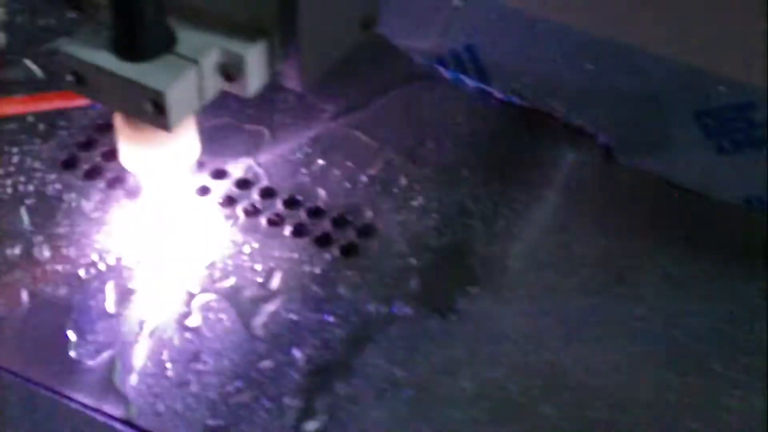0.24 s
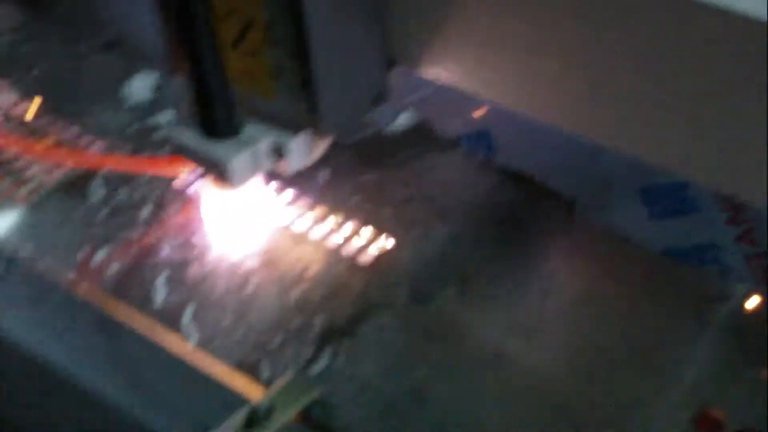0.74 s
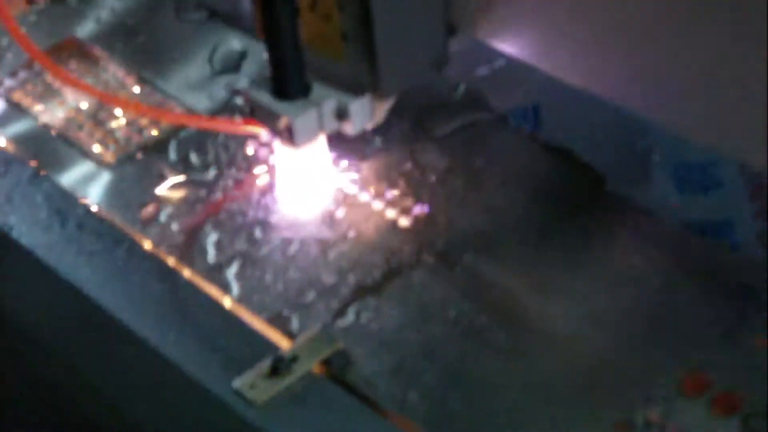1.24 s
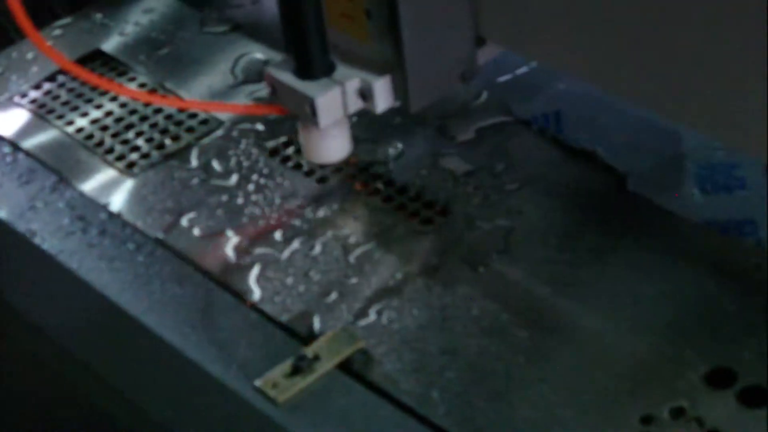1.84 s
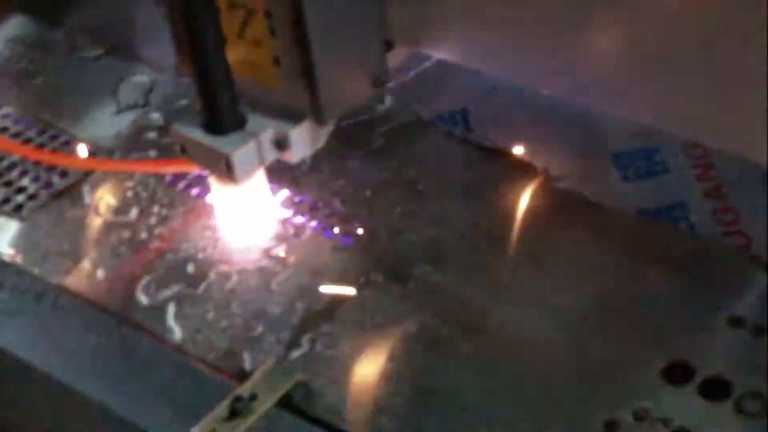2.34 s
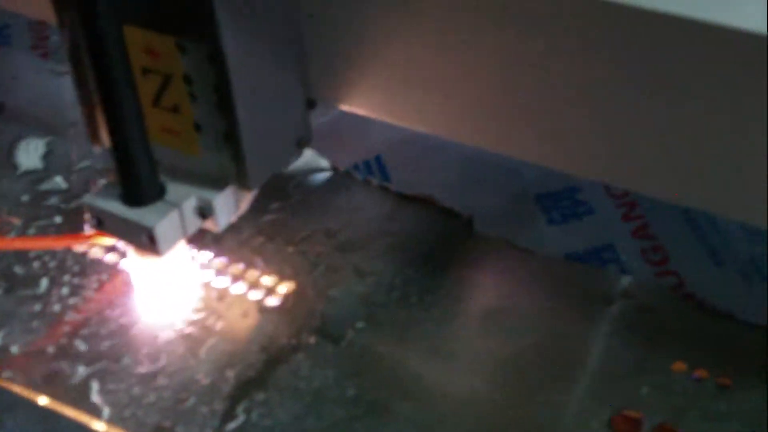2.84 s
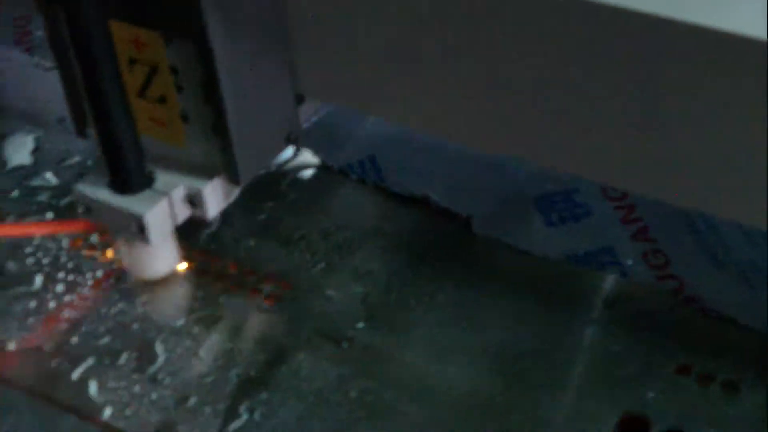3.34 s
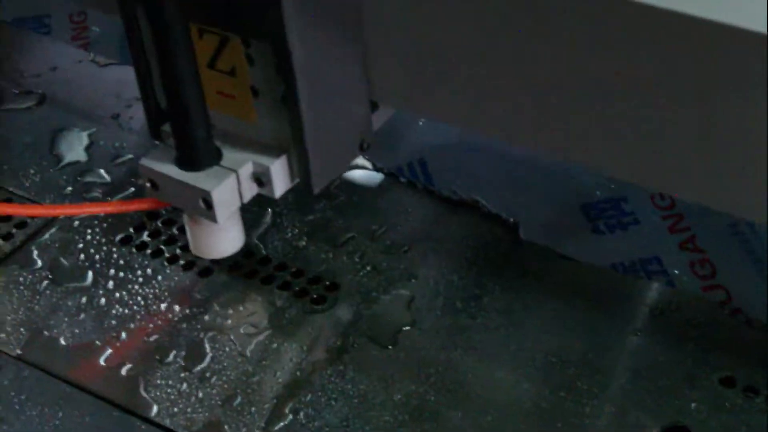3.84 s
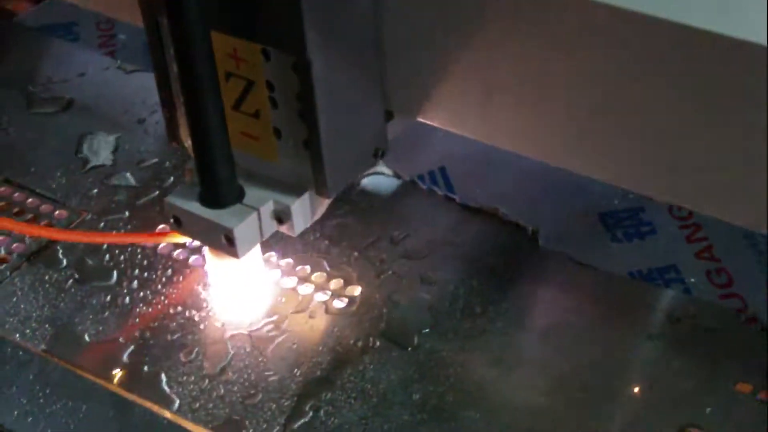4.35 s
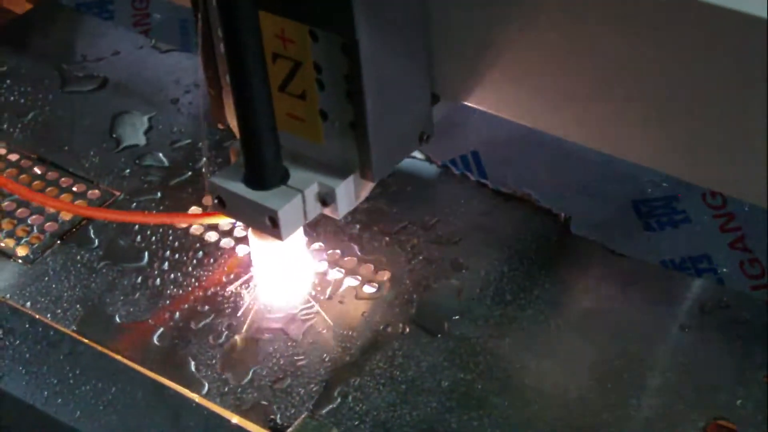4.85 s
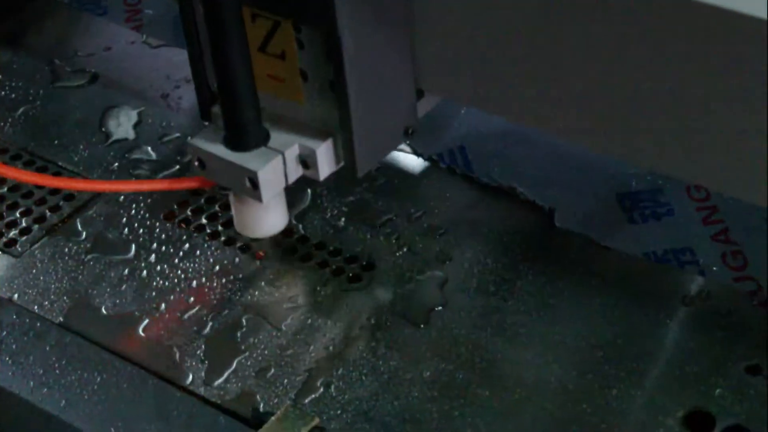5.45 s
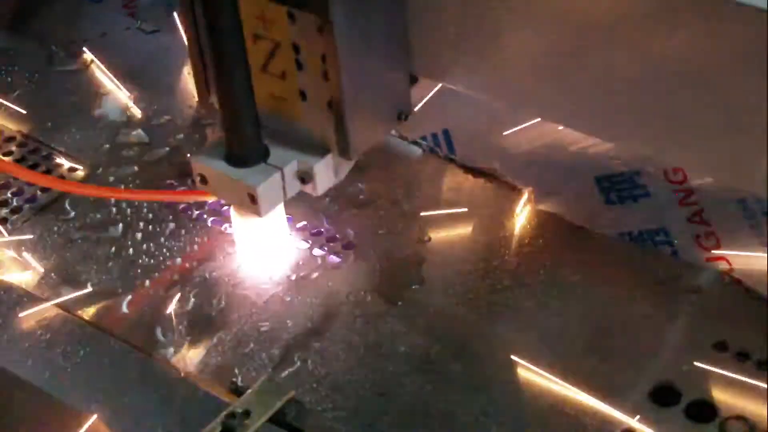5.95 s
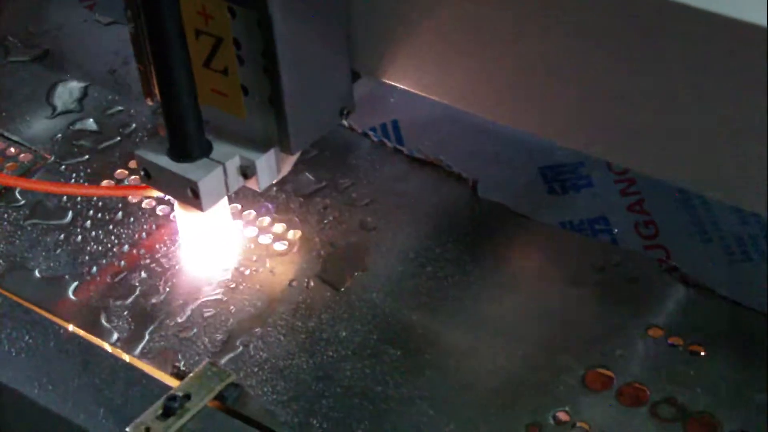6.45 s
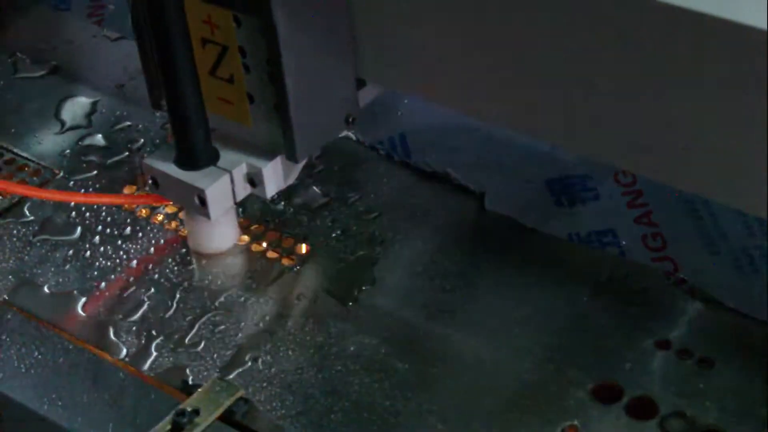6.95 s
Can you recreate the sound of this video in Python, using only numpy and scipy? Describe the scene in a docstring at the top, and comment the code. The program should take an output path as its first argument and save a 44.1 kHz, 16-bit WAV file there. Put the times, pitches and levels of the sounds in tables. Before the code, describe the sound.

A plasma torch cuts four small holes in a steel sheet, heard close by in a factory. Before each hole compressed air rushes and howls. The arc strikes with a sharp crack, blasts briefly through the metal, then hisses brightly for about a second with small ticks of spatter before it falters and goes out. Brief whistles come and go, while a thin drive whine and a low extractor drone sit underneath.

```python
"""A factory cutting table, where a plasma torch cuts four small holes in a steel sheet.
For each hole a turbulent air jet rushes, and the gap under the nozzle howls by resonance. The arc
strikes with a crack, pierces the sheet, hisses round the cut amid bursting droplets, falters and
goes out. Edge tones hoot now and then; the extractor drones and the drives whine throughout."""
import sys
import numpy as np
from scipy import signal
from scipy.fft import rfft, irfft, next_fast_len
from scipy.io import wavfile

SR = 44100
rng = np.random.default_rng(int(sys.argv[2]) if len(sys.argv) > 2 else 0)


def log_audio(samples):
    """Write samples as a 16-bit WAV file to the path given in sys.argv[1]."""
    # one column per channel
    frames = np.atleast_2d(samples).T
    # limit to full scale, then quantise
    limited = np.clip(frames, -1, 1)
    pcm = np.round(limited * 32767).astype(np.int16)
    wavfile.write(sys.argv[1], SR, pcm)


N = 317079
TIME = np.arange(N) / SR

# Levels in the tables are relative, within each source.
# The holes. Each row: strike, piercing time and settling time in seconds; levels of piercing, hiss,
# kerf roar, whine and falter in dB; pitch of the kerf whistle in Hz, its level in dB.
CUTS = [(0.287, 0.2, 0.23, -17, -16.5, -26, -30.5, -2, 5550, -34),
        (2.122, .201, 0.15, -16, -16.5, -26, -26.5, -5, 2580, -37),
        (3.9595, .197, 0.33, -17.5, -16.5, -27, -30.5, -3, 2610, -38),
        (5.799, 0.2, 0.17, -16.5, -16.5, -26.5, -31.5, -21.5, 4560, -38)]
# Torch moves, before each hole and after the last. Each row: levels in dB of rush (torch high),
# hiss (torch low), howl, low roar and whine.
TORCH_MOVES = [(-27, -18.5, -20, -29, -32), (-20.5, -19.5, -21.5, -27, -23.5), (-18, -20, -22, -26, -26.5),
               (-18.5, -19, -21.5, -27.5, -25.5), (-18.5, -19.3, -20.5, -29, -27)]
# The arc strikes, spits or falters. Each row: start in seconds, level in dB, pitch in Hz.
ARC_CRACKS = [(0.295, -9, 2800), (1.096, -12, 6600), (1.454, -18, 2030), (2.1247, -3, 2810),
              (2.131, -12, 7600), (3.28, -17, 2010), (3.9626, -2, 2640), (4.026, -13, 7160),
              (5.114, -12.5, 2240), (5.8005, -2, 2620), (6.945, -16, 1930)]
# Stray hoots, probably the jet crossing the edges of finished holes.
# Each row: middle in seconds, pitch in Hz, level in dB, length in seconds.
STRAY_HOOTS = [(.11, 603, -33, .26), (1.33, 1300, -28.5, 0.11), (1.41, 1084, -32, 0.32),
               (1.422, 3180, -33, 0.24), (1.70, 698, -29.5, 0.095), (1.828, 1104, -20, .023),
               (3.1, 7100, -26, .43), (3.315, 1500, -27, .056), (3.345, 770, -29.5, 0.058),
               (3.578, 2455, -21.5, 0.214), (3.78, 1114, -29.5, .24), (3.91, 2520, -22, 0.14),
               (3.95, 670, -26, 0.042), (5.775, 3010, -22, 0.072), (6.9, 1606, -27, .06)]
# Hum of the table and the hall's fans. Each row: pitch in Hz, level in dB, width in Hz.
HUM_TONES = [(250.3, -51.5, 8.3), (466, -49, 22), (686, -48.5, 3.5), (878, -49.5, 9.2), (1240, -48.5, 14.2)]
# Noise spectra. Each row: frequency in Hz, spectral density in dB.
RUSH_SPECTRUM = [(1500, -25), (3000, -22), (3800, -1.5), (4800, 0), (6000, 1), (7300, 3.5), (8500, 1.5),
                 (10500, -0.5), (12000, -4), (15000, -9.5)]  # air, torch high
HISS_SPECTRUM = [(1500, -14.5), (3600, -9), (4500, -2), (5500, -2), (6500, -0.5), (7500, 5), (8400, 7),
                 (10500, 5.5), (11400, 2.5), (12500, 1), (13600, -4), (15200, -3.5)]  # air, torch low
ROAR_SPECTRUM = [(80, -22.5), (200, -8), (300, -1), (480, -2), (700, 1), (880, -1.5), (1150, 0.5),
                 (1350, 4.5), (1600, 0), (2100, 0), (3000, -0.5), (5000, -34)]  # low roar of the air
WIDE_GAP = [(1500, -19), (2400, -2.5), (3300, -3.5), (4200, -4.5), (5200, -28)]  # howl, torch high
NARROW_GAP = [(1500, -58), (2100, -15), (2380, -1.5), (2800, -2), (3150, -2.5), (3450, -8), (3850, -13.5),
              (5000, -24)]  # howl, torch low
EXTRACTOR_SPECTRUM = [(22, -29), (45, -34), (57, -23), (66, -24.5), (92, -26), (114, -7), (132, -13),
                      (155, -2.5), (182, -7.5), (250, 2), (360, -1), (700, -5), (1300, 0), (3000, -3),
                      (12000, -47)]
BLAST_SPECTRUM = [(200, -19), (600, -7), (1150, -4), (1900, -0.5), (3000, 0), (4000, -1), (5500, 2.5),
                  (7300, 3), (8400, 8), (10500, 3.5), (12300, 2), (13300, -2), (15200, -4)]  # arc on the closed sheet
SHALLOW_PIT = [(9000, -20), (12200, -2), (13500, -5), (15200, -1)]
DEEP_PIT = [(2500, -38), (4600, -1), (6200, -0.5), (7300, 11.5), (8600, -12), (12000, -24)]
CUT_SPECTRUM = [(1500, -20), (3200, -8), (4500, 0.5), (6000, 0.5), (7100, 3.5), (8500, 3.5), (10500, 2),
                (12000, 1.5), (13500, -2), (15200, -3)]  # hiss of the cutting jet
KERF_SPECTRUM = [(150, -41), (430, -8), (700, -4.5), (950, -5.5), (1300, 3), (1600, 1.5), (2100, -2),
                 (2600, 4), (3300, 3), (4000, -2.5), (6000, -37.5)]  # roar in the slot being cut

# A move, timed from its start.
MOVE_S = .64  # length of the first and last moves
VALVE_S, VALVE_OPENS_S, IDLE_AIR_DB = .085, 0.065, -9.5  # the air idles, then reaches full flow
SINKS_S, SINKING_S = .28, 0.075  # the torch sinks to the sheet
HOWL_S, HOWL_BUILDS_S, HOWL_NARROWS_S, IDLE_HOWL_DB = .07, 0.13, 0.32, -18.5
ROAR_S, ROAR_BUILDS_S, IDLE_ROAR_DB = 0.053, 0.2, -9.5
BUFFET_S, BUFFET_WIDTH_S, BUFFET_DB = 0.353, 0.044, 4.5  # the sinking jet buffets the sheet
WHINE_GROWS_DB_PER_S, WHINE_PEAK_DB, WHINE_PEAK_S = 7, 3, 0.08  # the whine peaks at the strike
# A cut, timed from the breakthrough. At first the jet is slack, falling freely through the fresh pit.
SLACK_S, SLACK_HISS_DB, SLACK_ROAR_DB, SLACK_WHINE_DB = 0.06, -5, -6.5, -9.5
FACING_S, TURN_S, TURN_HISS_DB, TURN_ROAR_DB = 0.46, 0.61, .5, 1.28  # the torch circles
CLOSING_S, CLOSING_TAKES_S, CLOSING_HISS_DB, CLOSING_ROAR_DB = 0.74, 0.26, 0.55, 4  # the circle closes
BURN_S, FALTER_S, CATCH_S = 1.198, .042, .023  # the arc's life; falter and catch count back from its end


def amp(db):
    """Amplitude grows tenfold with every 20 dB."""
    return 10 ** (np.asarray(db) / 20)


def unit(x):
    """Normalisation to rms 1."""
    return x / np.sqrt(np.mean(x ** 2) + 1e-20)


def gate(start, stop, rise, fall):
    """Exponential growth from start and decay from stop, with time constants in seconds."""
    return (1 - np.exp(-np.maximum(TIME - start, 0) / rise)) * np.exp(-np.maximum(TIME - stop, 0) / fall)


def ramp(start, length):
    """Linear rise from 0 to 1."""
    return np.clip((TIME - start) / length, 0, 1)


def colour(spectrum, hz):
    """Spectral envelope in dB, rolling off by 18 dB an octave below its first point."""
    f, level = np.transpose(spectrum)
    return np.interp(np.log(hz + 1), np.log(f), level) + 18 * np.minimum(np.log2((hz + 1) / f[0]), 0)


def wander(rate_hz):
    """Low-pass noise: a smooth random fluctuation of rms 1."""
    hz = np.fft.rfftfreq(N, 1 / SR)
    smooth = irfft(rfft(rng.standard_normal(N)) * np.exp(-(hz / rate_hz) ** 2), N)
    return unit(np.interp(TIME, TIME[::16], smooth[::16]))


def patches(shape, span_s, span_hz):
    """A random field of rms 1, correlated over the given time and bandwidth, with no broad tilt."""
    frames, bins = shape
    in_time = np.exp(-(np.fft.fftfreq(frames, 512 / SR) * span_s * 2) ** 2)
    fineness = np.fft.rfftfreq(bins, SR / 2048) * span_hz * 2
    in_pitch = fineness * np.exp(-fineness ** 2)
    white = np.fft.rfft2(rng.standard_normal(shape))
    return unit(np.fft.irfft2(white * in_time[:, None] * in_pitch, shape))


def jet(spectrum, ripple_db, eddy_db, flutter_db, eddy_hz=300):
    """Turbulent noise: reflections off the steel comb its spectrum; eddies make it flicker and flutter."""
    hz = np.fft.rfftfreq(2048, 1 / SR)
    shape = (next_fast_len(N // 512 + 5), len(hz))
    comb = patches(shape, .6, 45) + .45 * patches(shape, .6, 170)
    field_db = colour(spectrum, hz) + ripple_db * comb + eddy_db * patches(shape, 0.018, eddy_hz)
    frames = (rng.standard_normal(shape) + 1j * rng.standard_normal(shape)) * amp(field_db)
    noise = signal.istft(frames.T, nperseg=2048, noverlap=1536)[1][:N]
    return unit(noise * amp(flutter_db * wander(91)))


def tone(hz, width_hz, steady):
    """Multipath interference in the hall makes a tone waver."""
    fading = steady + (wander(width_hz) + 1j * wander(width_hz)) / np.sqrt(2)
    return unit((fading * np.exp(2j * np.pi * hz * TIME)).real)


def arcs():
    """Times at which each arc strikes, breaks through and goes out."""
    return [(strike, strike + pierce, strike + BURN_S) for strike, pierce, *_ in CUTS]


def travels():
    """Start and end of each move, between one arc and the next."""
    strikes, _, outs = zip(*arcs())
    return list(zip([strikes[0] - MOVE_S, *outs], [*strikes, outs[-1] + MOVE_S]))


def air():
    """Jet noise and gap resonance: as the torch sinks, the hiss hollows out and the howl narrows."""
    rush, hiss, roar, howl, wide = np.zeros((5, N))
    for (start, strike), (rush_db, hiss_db, howl_db, roar_db, _) in zip(travels(), TORCH_MOVES):
        blowing = gate(start, strike, .003, 0.0039)
        high = np.exp(-np.maximum(TIME - start - SINKS_S, 0) / SINKING_S)
        wide = np.where(TIME >= start, 1 - ramp(start + HOWL_S, HOWL_NARROWS_S), wide)
        flow = blowing * amp(IDLE_AIR_DB * (1 - ramp(start + VALVE_S, VALVE_OPENS_S)))
        rush += flow * np.sqrt(high) * amp(rush_db)
        hiss += flow * np.sqrt(1 - high) * amp(hiss_db)
        buffet = np.exp(-((TIME - start - BUFFET_S) / BUFFET_WIDTH_S) ** 2)
        roar_idle = 1 - ramp(start + ROAR_S, ROAR_BUILDS_S)
        roar += blowing * amp(roar_db + IDLE_ROAR_DB * roar_idle + BUFFET_DB * buffet)
        # the howl lingers under the young arc and fades as the steel melts
        melting = amp(-2.0 - 42 * np.maximum(TIME - strike, 0))
        lingering = melting * gate(strike, strike + .195, .0048, .004)
        howl_idle = 1 - ramp(start + HOWL_S, HOWL_BUILDS_S)
        howl += (blowing + lingering) * amp(howl_db + IDLE_HOWL_DB * howl_idle)
    wide_gap = jet(WIDE_GAP, ripple_db=2.5, eddy_db=0.5, flutter_db=0.1)
    narrow_gap = amp(0.54) * jet(NARROW_GAP, ripple_db=1.9, eddy_db=3, flutter_db=0.55, eddy_hz=250)
    return (rush * jet(RUSH_SPECTRUM, ripple_db=1.0, eddy_db=2.5, flutter_db=0.5)
            + hiss * jet(HISS_SPECTRUM, ripple_db=3.0, eddy_db=-0.5, flutter_db=0.5)
            + roar * jet(ROAR_SPECTRUM, ripple_db=2.5, eddy_db=0.5, flutter_db=1.15)
            + howl * (np.sqrt(wide) * wide_gap + np.sqrt(1 - wide) * narrow_gap))


def machine():
    """Rotating machinery: broadband drone, fan tones and drive whine, all dipping during piercing."""
    envelope = amp(colour(EXTRACTOR_SPECTRUM, np.fft.rfftfreq(N, 1 / SR)))
    drone = amp(-33) * unit(irfft(rfft(rng.standard_normal(N)) * envelope, N))
    drone += sum(amp(db) * tone(hz, width, steady=.7) for hz, db, width in HUM_TONES)
    dip = sum(gate(strike, through, 0.02, 0.0173) for strike, through, _ in arcs())
    whine = np.zeros(N)
    for (start, strike), (*_, whine_db) in zip(travels(), TORCH_MOVES):
        ahead = np.maximum(strike - TIME, 0)
        swell_db = WHINE_PEAK_DB * np.exp(-ahead / WHINE_PEAK_S) - WHINE_GROWS_DB_PER_S * ahead
        whine += gate(start, strike, 0.046, .005) * amp(whine_db + swell_db)
    for (_, through, out), (_, _, settle, _, _, _, whine_db, *_) in zip(arcs(), CUTS):
        slack = 1 - ramp(through, settle)
        whine += gate(through, out, 0.0096, 0.021) * amp(whine_db + SLACK_WHINE_DB * slack)
    return drone * amp(-10.5 * dip) + whine * tone(6748, width_hz=36, steady=.6)


def hoot_events(sinking_hz=660, pit_hz=1130, pit_s=.08):
    """Edge tones on the way down, in the fresh pit and along the kerf, then the strays, in like rows."""
    rows = [(start + BUFFET_S, sinking_hz, -28.5, .075) for start, _ in travels()[1:-1]]
    for (strike, through, out), (*_, kerf_hz, level_db) in zip(arcs(), CUTS):
        rows.append((strike + pit_s / 2, pit_hz, -32.5, pit_s))
        rows.append((through + 0.63 * (out - through), kerf_hz, level_db, .7 * (out - through)))
    return rows + list(STRAY_HOOTS)


def hoots(width_hz=18, q=120):
    """Edge tones: a jet oscillates across an edge, giving a narrow noise band that swells and fades."""
    out = np.zeros(N)
    for middle, hz, level_db, length in hoot_events():
        t = np.arange(int(length * SR)) / SR
        blur = signal.butter(2, width_hz + hz / q, fs=SR, output="sos")
        drift = signal.sosfilt(blur, rng.standard_normal((2, 2 * SR)))[:, -len(t):]
        band = ((drift[0] + 1j * drift[1]) * np.exp(2j * np.pi * hz * t)).real
        hoot = unit(band * np.sin(np.pi * t / length))
        part = out[max(round((middle - length / 2) * SR), 0):][:len(t)]
        part += (amp(level_db - 5.0) * hoot)[:len(part)]
    return out


def piercing():
    """Cavity resonance: the arc blasts off the sheet, and the deepening pit rings lower until it opens."""
    blast, sizzle, shriek = np.zeros((3, N))
    for (strike, through, _), (_, _, _, level_db, *_) in zip(arcs(), CUTS):
        burning = amp(level_db) * gate(strike, through, 0.00078, 0.004)
        depth = np.clip((TIME - strike) / (through - strike), 0, 1)
        blast += burning * amp(1.26 - 2.82 * depth)
        sizzle += burning * amp(-7.0) * np.exp(-((depth - .55) / .25) ** 2)
        shriek += burning * amp(-1 - 24 * (1 - depth))
    return (blast * jet(BLAST_SPECTRUM, ripple_db=2.5, eddy_db=1.0, flutter_db=-1.2)
            + sizzle * jet(SHALLOW_PIT, ripple_db=3.5, eddy_db=2, flutter_db=2)
            + shriek * jet(DEEP_PIT, ripple_db=3.5, eddy_db=-1, flutter_db=1.5))


def cracks():
    """Impulse response: each crack rings the nozzle gap briefly, then scatters off the machine."""
    out = np.zeros(N)
    t = np.arange(SR // 10) / SR
    for start, level_db, hz in ARC_CRACKS:
        ring = 1.57 * np.sin(2 * np.pi * hz * t) * np.exp(-t / 0.0015)
        spit = .25 * np.diff(rng.standard_normal(len(t) + 1)) * np.exp(-t / 0.0017)
        band = signal.butter(2, [hz * .5, hz * 1.7], "band", fs=SR, output="sos")
        scatter = 0.14 * unit(signal.sosfilt(band, rng.standard_normal(len(t)))) * np.exp(-t / 0.023)
        part = out[round(start * SR):][:len(t)]
        part += (amp(level_db) * (ring + spit + scatter))[:len(part)]
    return signal.sosfilt(signal.butter(3, 700, "high", fs=SR, output="sos"), out)


def spatter(per_s=16):
    """A Poisson process: droplets of molten steel burst in bright ticks while the arc burns."""
    burning = sum(gate(strike, out, .01, .005) for strike, _, out in arcs())
    bursts = (rng.random(N) < burning * per_s / SR) * amp(3.5 * np.minimum(rng.exponential(1, N), 2))
    t = np.arange(SR // 200) / SR
    tick = amp(-22) * rng.standard_normal(len(t)) * np.exp(-t / 0.00052)
    ticks = signal.oaconvolve(bursts, tick)[:N]
    return signal.sosfilt(signal.butter(3, 2500, "high", fs=SR, output="sos"), ticks)


def cutting():
    """Turbulence in the kerf: the jet circles; as the slug drops, the arc falters, catches and dies."""
    hiss, roar = np.zeros((2, N))
    for (_, through, out), (_, _, settle, _, hiss_db, roar_db, _, dip_db, *_) in zip(arcs(), CUTS):
        falter = gate(out - FALTER_S, out - CATCH_S, 0.0099, 0.0016)
        arc = gate(through, out, 0.00075, 0.0095) * amp(dip_db * falter)
        hall_tail = amp(-4.5) * gate(through, out - FALTER_S, .03, 0.064)
        sounding = np.maximum(arc, hall_tail)
        slack = (1 - ramp(through + SLACK_S, settle)) ** 1.7
        turn = np.cos(2 * np.pi * (TIME - through - FACING_S) / TURN_S)
        closing = ramp(through + CLOSING_S, CLOSING_TAKES_S)
        hiss_swing_db = SLACK_HISS_DB * slack + TURN_HISS_DB * turn + CLOSING_HISS_DB * closing
        roar_swing_db = SLACK_ROAR_DB * slack + TURN_ROAR_DB * turn + CLOSING_ROAR_DB * closing
        hiss += sounding * amp(hiss_db + hiss_swing_db)
        roar += sounding * amp(roar_db + roar_swing_db)
    return (hiss * jet(CUT_SPECTRUM, ripple_db=2.5, eddy_db=2.04, flutter_db=0.53)
            + roar * jet(KERF_SPECTRUM, ripple_db=3.0, eddy_db=1.0, flutter_db=0.6))


def scene():
    """Superposition: all sources add at one point near the torch, alike in both channels."""
    mono = air() + hoots() + piercing() + cutting() + cracks() + spatter() + machine()
    return np.array([mono, mono])


def record(dry):
    """Filtering and overload: a narrow treble notch, clipping on the cracks, and a band limit."""
    notched = signal.lfilter(*signal.iirnotch(7915, Q=36, fs=SR), dry)
    clipped = np.clip(notched, -.87, .87)
    low_pass = signal.firwin(1023, cutoff=15300, window=("kaiser", 9), fs=SR)
    return signal.oaconvolve(clipped, low_pass[None], "same")


dry = scene()
out = record(dry)
log_audio(out)
```